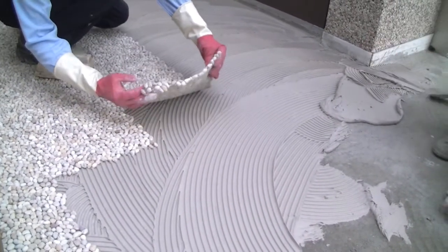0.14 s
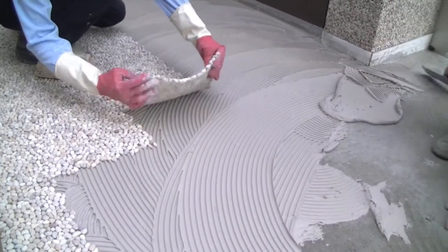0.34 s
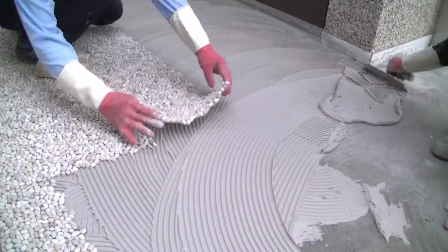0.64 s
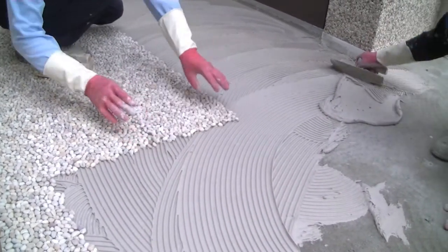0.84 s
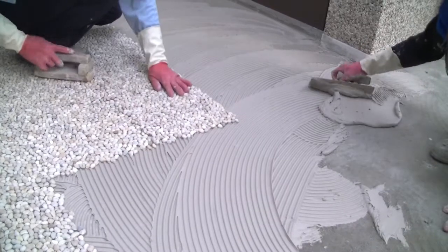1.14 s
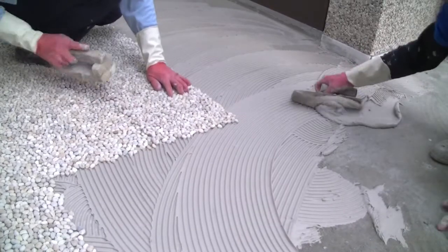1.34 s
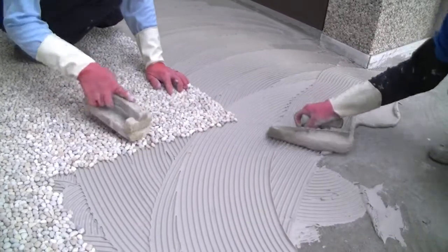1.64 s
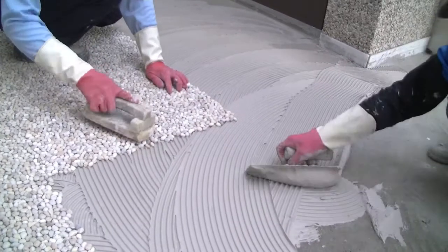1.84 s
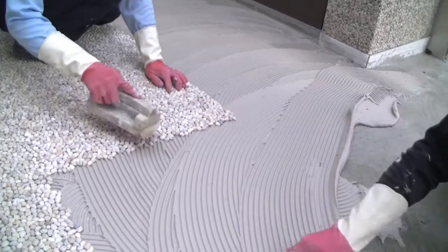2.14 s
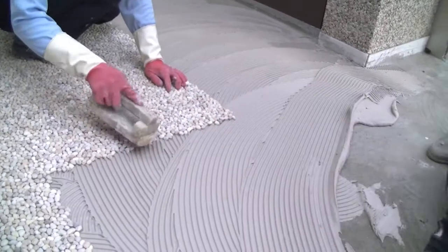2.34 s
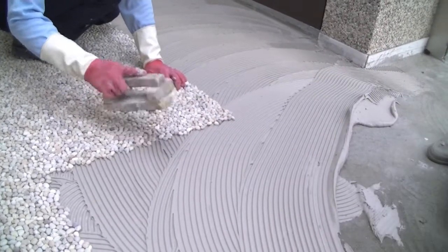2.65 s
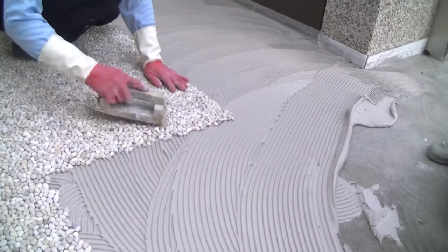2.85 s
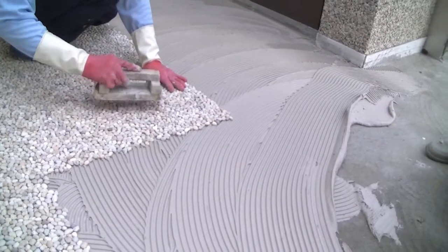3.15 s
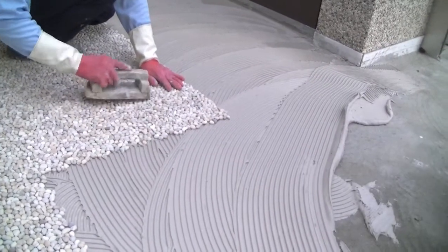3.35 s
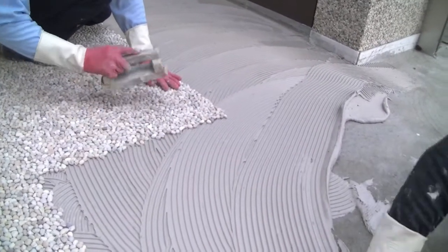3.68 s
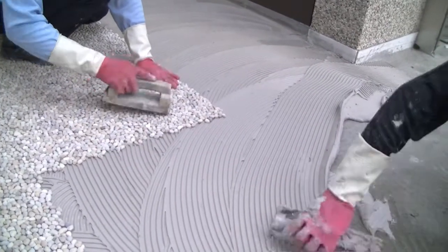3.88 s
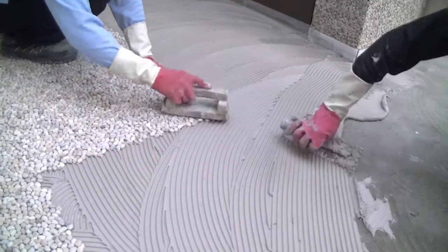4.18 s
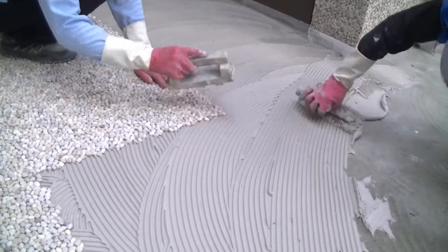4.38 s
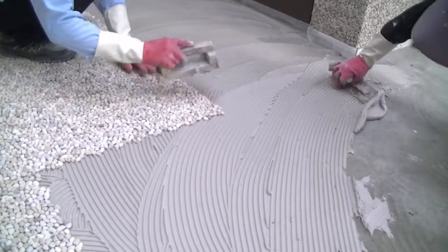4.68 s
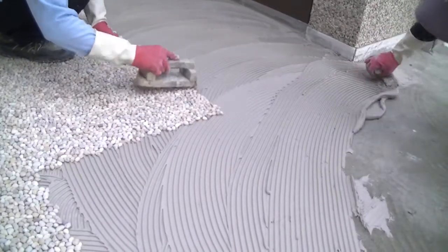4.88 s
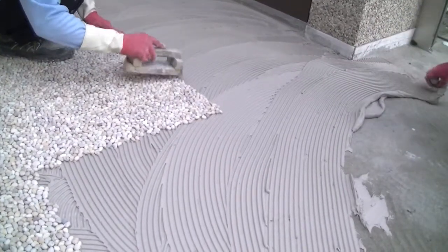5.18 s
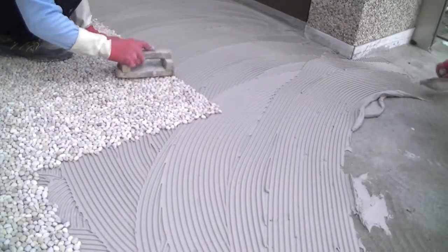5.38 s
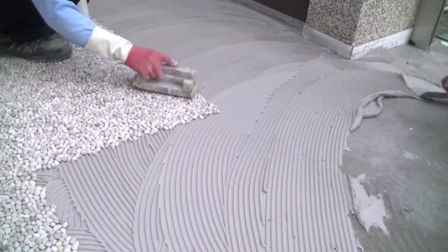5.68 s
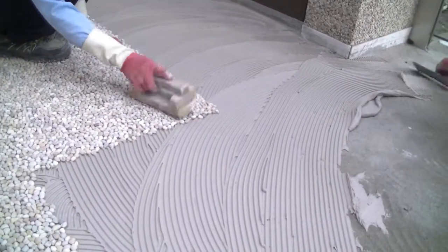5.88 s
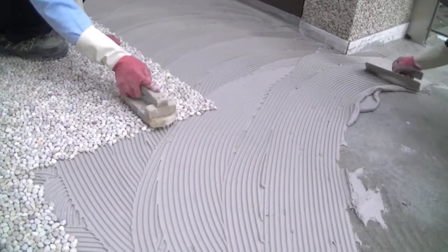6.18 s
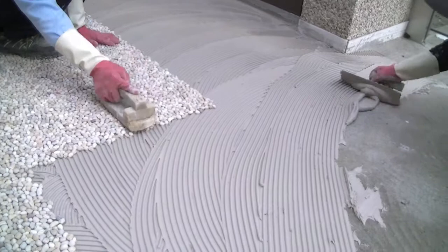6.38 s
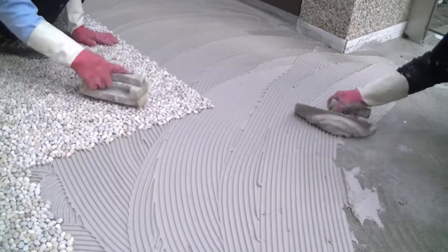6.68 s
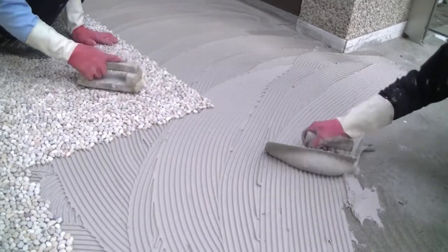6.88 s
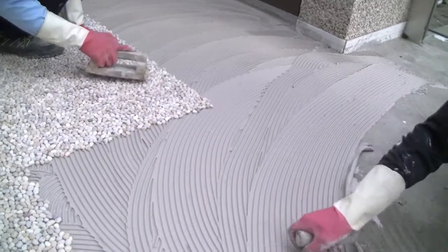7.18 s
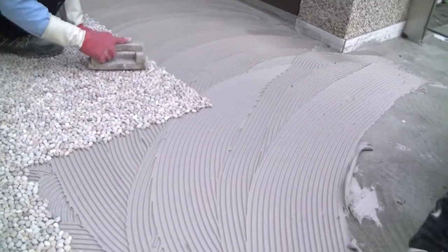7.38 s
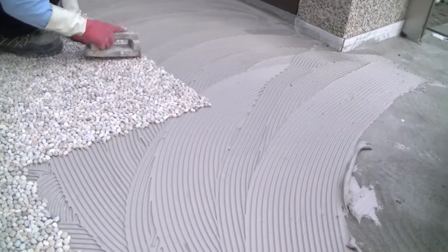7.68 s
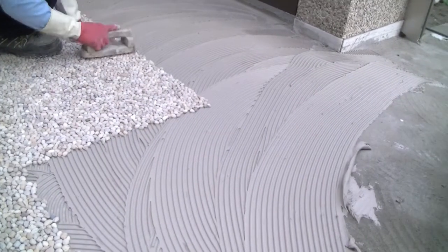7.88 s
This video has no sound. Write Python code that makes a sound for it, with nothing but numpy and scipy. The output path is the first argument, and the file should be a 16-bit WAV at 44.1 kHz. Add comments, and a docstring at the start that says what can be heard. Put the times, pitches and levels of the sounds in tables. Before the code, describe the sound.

Close beside a bare-walled floor, a steel trowel gives a short scuff and a few pebble ticks, then a long gritty scrape that swells. Midway through, a wooden float begins knocking pebbles with sharp stony clacks, about four a second, and continues to the end while two more long scrapes pass. Short hard reflections follow each sound; a faint site wash lies beneath. Thin, bright, nearly mono pickup with little bass.

```python
"""Trowel and float on tile adhesive

A notched steel trowel combs gritty adhesive over concrete in long strokes: dense random grain snaps
excite resonances of plate, blade, teeth and grit. A wooden float taps a pebble mat into the bed about
four times a second: clusters of contacts ring wood and stone. Loose pebbles and the blade edge tick.
Bare walls close by answer with a short tail of random-phase noise; a distant site washes underneath."""
import sys
import numpy as np
from scipy import signal
from scipy.fft import rfft, irfft, next_fast_len
from scipy.io import wavfile
from scipy.ndimage import uniform_filter1d, map_coordinates

SR = 44100
rng = np.random.default_rng(int(sys.argv[2]) if len(sys.argv) > 2 else 0)


def bounce(signal):
    """Save signal as a 16-bit WAV file at the path given by the first command-line argument."""
    frames = np.transpose(np.atleast_2d(signal))
    limited = np.clip(frames, -1, 1)
    pcm = np.round(limited * 32767).astype(np.int16)
    wavfile.write(sys.argv[1], SR, pcm)


N = 354123


def gain_of(db):
    """Decibels to an amplitude factor."""
    return 10 ** (np.asarray(db) / 20)


def evened(x):
    """Scaled to an rms of one."""
    return x / np.sqrt(np.mean(x ** 2) + 1e-20)


def read(points, hz):
    """A table interpolated over log frequency."""
    f, value = np.transpose(points)
    return np.interp(np.log(hz + 1), np.log(f + 1), value)


def add(mix, s, sound):
    """Mixes a sound in at time s."""
    part = mix[round(s * SR):][:len(sound)]
    part += sound[:len(part)]


def smooth_noise(shape, size):
    """Slow random wander: noise averaged twice over size samples."""
    return uniform_filter1d(uniform_filter1d(rng.standard_normal(shape), size=size), size=size)


def ring(hz, db, t60, size=2048):
    """A struck mode: a sine dying 60 dB in t60 seconds."""
    t = np.arange(size) / SR
    return gain_of(db - 60 * t / t60) * np.sin(2 * np.pi * hz * t)


def later(x, ms):
    """A copy that arrives a fixed or changing time later."""
    return map_coordinates(x, [np.arange(N) - ms * SR / 1000], order=3)


def resonate(x, hz, width_hz):
    """A moving resonance: shifts the curve hz down to zero, smooths, and shifts back."""
    turn = np.exp(2j * np.pi * np.cumsum(hz) / SR)
    r = np.exp(-np.pi * width_hz / SR)
    return (turn * signal.lfilter([1 - r], [1, -r], x / turn)).real


def resonate_twice(x, hz, width_hz, second_width_hz):
    """Two moving resonances in series for steeper skirts, at an rms of one."""
    return evened(resonate(resonate(x, hz, width_hz), hz, second_width_hz))


def site():
    """Steady distant wash of the site and the microphone's hiss: noise shaped in frequency."""
    # relative spectrum: (frequency [Hz], level per Hz [dB])
    wash_spectrum = [(18, -51), (30, 0), (540, -4), (2170, -5.5), (2750, -6.5), (2980, -7), (4530, -11.5),
                     (8740, -16), (14000, -44), (16000, -48)]
    hz = np.fft.rfftfreq(N, 1 / SR)
    a, b = irfft(rfft(rng.standard_normal((2, N))) * gain_of(read(wash_spectrum, hz)), N)
    return gain_of(-54) * evened(np.array([a + 0.21 * b, a - 0.25 * b]))


def walls(x):
    """Diffuse tail: power in each band lingers and dies at its own speed, with random phase."""
    # (frequency [Hz], t60 [s])
    wall_t60 = [(300, 0.5), (800, 0.27), (2100, 0.24), (5500, 0.31), (12000, 0.16)]
    # colour of the tail: (frequency [Hz], gain [dB])
    wall_colour = [(300, -1), (1500, -1.5), (4000, -1.5), (10000, 4), (13000, 1), (14500, -6), (16000, -30)]
    hop = 64
    frames = dict(fs=SR, nperseg=256, noverlap=256 - hop)
    hz, _, z = signal.stft(np.roll(x, 560), **frames)
    keep = gain_of(-120 * hop / SR / read(wall_t60, hz))  # a power factor, hence 120
    narrow, wide = (uniform_filter1d(abs(z) ** 2, size=n, axis=0) for n in (3, 15))
    # many scattered paths even out the colour, most in the treble
    blend = np.clip(hz / 5000, 0, 1)[:, None]
    fed = narrow + blend * (wide - narrow)
    power = np.array([signal.lfilter([1 - k], [1, -k], p) for k, p in zip(keep, fed)])
    a, b = rng.standard_normal((2, 2) + z.shape)
    field = (a + 1j * b) * np.sqrt(2 * abs(power)) * gain_of(read(wall_colour, hz))[:, None]
    mid, side = signal.istft(field, **frames)[1][:, :N]
    side = signal.sosfilt(signal.butter(2, 11500, fs=SR, output="sos"), side)
    return np.array([mid + 0.1 * side, mid - 0.18 * side])  # the ports hear nearly the same


def ports(x, lead):
    """Two close microphone ports: a small scattered difference that depends on frequency."""
    # difference between the ports, before the lead factor: (frequency [Hz], level [dB])
    port_difference = [(60, -21), (290, -47), (640, -25.5), (1410, -26.5), (2800, -17.5), (4300, -8.5),
                       (6500, -19), (9500, -14.5), (12500, -35), (15000, -48)]
    size = next_fast_len(N)
    hz = np.fft.rfftfreq(size, 1 / SR)
    scatter_s = 0.0005  # decay constant of the scatter around the housing
    paths = rng.standard_normal(1024) * np.exp(-np.arange(1024) / SR / scatter_s)
    scatter = 1j * abs(rfft(paths / np.linalg.norm(paths), size))
    scatter *= lead * gain_of(read(port_difference, hz))
    side = irfft(rfft(x, size) * scatter, size)[:N]
    return np.array([x + side, x - side])


def ticks():
    """Loose pebbles and the blade edge: short decaying noise rattles a bright mode."""
    # (time [s], peak level [dB], pitch [Hz], decay constant, at least 0.0005 [s], t60 of the ring [s])
    rattles = [(0.016, -40, 2760, 0.0044, 0.00062), (0.043, -34.5, 3630, 0.014, 0.00071),
               (0.141, -27, 7300, .0035, 0.0009), (0.184, -50, 7140, .002, .001),
               (0.24, -35, 10200, .001, 0.00065), (0.3022, -41, 9290, .0027, .001),
               (0.626, -27, 4400, 0.0023, .003), (0.667, -18.5, 6840, 0.0029, 0.0051),
               (0.668, -27, 3670, 0.0045, 0.0092), (0.765, -23.5, 8400, 0.0036, 0.00092),
               (3.675, -17, 10000, 0.0018, .001), (5.382, -29, 5100, .002, .003),
               (5.424, -39, 9500, .004, .001), (5.459, -40, 6500, .002, .001),
               (5.853, -57, 9000, .003, .001)]
    out = np.zeros(N)
    for (s, db, hz, decay_s, t60), chance in zip(rattles, rng.standard_normal((len(rattles), 800))):
        burst = chance * np.exp(-np.arange(len(chance)) / SR / max(decay_s, .0005))
        rattle = np.convolve(burst, ring(hz, 0, t60, size=400))
        add(out, s, gain_of(db) * rattle / abs(rattle).max())
    return out


def impact_parts(contacts):
    """Contacts ring the wooden float, click the stones and thud; each part at a peak of one."""
    # modes of the float: (pitch [Hz], level [dB], t60 [s])
    float_modes = [(1525, 7, 0.0036), (2280, 2, 0.011), (2870, -3, 0.0057), (3820, 4.5, 0.0034),
                   (4390, -3.5, 0.006)]
    wood = sum((-1) ** k * ring(*mode) for k, mode in enumerate(float_modes))
    wood = np.convolve(wood, [1, -1])  # a small body sends out little bass
    stone = ring(9600, 0, .0015) + ring(7000, -2, .0015) + ring(12000, -14, .001)
    stone = np.convolve(stone, ring(9000, 0, .0004, size=64))
    thud = np.convolve(ring(724, 0, 0.011), ring(800, 0, 0.004, size=64))
    parts = [np.convolve(contacts, body[:2048]) for body in (wood, stone, thud)]
    return [part / abs(part).max() for part in parts]


def tap(row, chance):
    """The float lands on many pebbles within milliseconds; each contact clicks and rings the wood."""
    s, db, *clack, linger_hz, tick_db, thud_db, linger_db = row
    t = np.arange(len(chance)) / SR
    spread_s = .003
    onset = np.minimum(t / spread_s, 1)
    landing = np.minimum(t / 0.0003, 1) * np.exp(-(t / spread_s) ** 4 - t / spread_s / 2)
    # pebbles keep crackling as they settle into the bed
    settling = gain_of(-11 - 60 * t / 0.05) * onset
    contacts = (chance * (landing + settling) * (abs(chance) > .8))[:2048]
    # fuzzy rings linger at the pitches of float and thud: (pitch, gain in dB, width in Hz)
    lingering = ((linger_hz, 0, 55), (clack[1], -7, 250), (650, -6, 150))
    sound = sum(gain_of(g) * evened(resonate(chance, np.full(len(t), f), width))
                for f, g, width in lingering)
    sound *= gain_of(linger_db - 60 * t / .5) * np.minimum(t / 0.0035, 1)
    # the clack is driven while the float lands, then damped
    knock = sum(gain_of(g) * np.sin(2 * np.pi * f * t) for f, g in zip(clack[:3], clack[3:]))
    sound += knock * (landing + 0.12 * onset * gain_of(-60 * t / .025))
    wood, stone, thud = impact_parts(contacts)
    add(sound, 0, gain_of(-7) * wood + gain_of(tick_db) * stone + gain_of(thud_db) * thud)
    push_s = 0.0014  # the slab gives a low push
    push = gain_of(-24) * t / push_s * np.exp(1 - t / push_s)
    return s, gain_of(db) * (sound + push)


def float_taps():
    """Every blow, with its slap off the nearest wall: a delayed, roughened copy."""
    # (time [s], blow level [dB], three clack pitches [Hz], their three levels [dB],
    #  lingering pitch [Hz], stone tick level [dB], wooden thud level [dB], lingering level [dB]),
    # part levels relative to the blow
    blow_rows = [(1.5872, -11, 1360, 2330, 2810, -12, -3.5, -9, 1800, -0.5, -31, -40),
                 (1.8307, -6.5, 1380, 2200, 3060, -6.5, -5, -7, 1960, -8.5, -36, -29.5),
                 (2.0538, -10.5, 1310, 2175, 4800, -10, -5, -16, 1400, 1, -34, -28),
                 (2.2714, -8.5, 2120, 3050, 4240, -4, -6, -17, 1990, -9, -30, -32),
                 (2.4925, -7.5, 1300, 1980, 2740, -10, -9, -8.5, 1370, -6, -21, -26),
                 (2.758, -7, 2210, 2800, 3550, -8.5, -6.5, -23, 2140, -6.5, -17, -34),
                 (3.034, -8.5, 1580, 2390, 2910, -7.5, -10.5, -9, 2150, -5, -18, -33),
                 (3.2815, -10, 1570, 1780, 2290, -8, -5.5, -7, 1950, -4.5, -23, -31),
                 (3.5163, -11.5, 1990, 2260, 2750, -5.5, -6, -11, 2060, 0.5, -15, -35),
                 (3.806, -9, 1370, 2080, 2460, -4, -7, -7, 1680, -16, -38, -41),
                 (4.1678, -10.5, 1390, 2510, 3520, -10, -7, -9, 1310, -2, -24, -23),
                 (4.4975, -9, 1220, 1620, 2860, -10, -8, -8, 1350, -3.5, -13.5, -31),
                 (4.8043, -10.5, 1250, 1990, 3150, -9, -6, -7, 2030, -3, -14, -25.5),
                 (5.092, -9, 1900, 2290, 2800, -2, -11, -14, 1990, -5, -12, -25.5),
                 (5.3642, -11.5, 1330, 2610, 3000, -10.5, -7.5, -8.5, 1400, 0, -21, -40),
                 (5.6474, -6.5, 1220, 1450, 2210, -11, -4.5, -12, 1600, -9, -14, -28.5),
                 (5.911, -12, 1310, 2530, 3560, -9.5, -5.5, -11, 2100, 0, -19, -24.5),
                 (6.153, -12, 2310, 2800, 3170, -4, -5, -16, 1960, 1, -30, -29),
                 (6.392, -9.5, 1170, 2080, 2580, -8, -9, -2, 1960, -1, -10, -29),
                 (6.6402, -10, 1290, 2100, 2890, -6.5, -5, -7, 2200, -4, -31, -45),
                 (6.8897, -9, 1530, 1860, 4240, -5, -8, -13, 1590, -1, -16, -23.5),
                 (7.1381, -11.5, 1040, 1650, 2885, -17, -3.5, -11, 1270, -6, -10, -26.5),
                 (7.386, -11, 1220, 1640, 2050, -15, -7, -8, 2110, -11, -18, -25),
                 (7.634, -13, 2210, 2410, 3470, -3, -14, -13, 1310, -10, -10, -25),
                 (7.8753, -7.5, 1300, 2210, 3130, -7.5, -7, -7, 1140, -14, -15, -32)]
    out = np.zeros(N)
    for row, chance in zip(blow_rows, rng.standard_normal((len(blow_rows), 14000))):
        add(out, *tap(row, chance))
    rough_wall = rng.standard_normal(220) * np.exp(-np.arange(220) / SR / .0015)
    rough_wall = np.convolve(rough_wall / np.linalg.norm(rough_wall), [.25, .5, .25])
    slap = signal.oaconvolve(later(out, 8.4), rough_wall)[:N]
    return out + 0.28 * slap


def hand():
    """Hand on blade: levels of plate, flex, teeth, grit and rasp; pitches of rasp and drone, over time."""
    # one table a stroke: (time [s], blade flex level [dB], teeth level [dB], grit fizz level [dB],
    #  plate drone level [dB], drone pitch [Hz])
    stroke_tables = [
        [(0.66, -41, -43.5, -45.5, -45, 650), (0.94, -39, -40.5, -42.5, -40, 640),
         (1.1, -33.5, -32, -38.5, -37, 674), (1.24, -38, -37, -40.5, -39, 585),
         (1.33, -34.5, -37, -39.5, -38.5, 745), (1.55, -35, -36.5, -38, -37.5, 676),
         (1.72, -33, -32, -34, -35.5, 710), (1.85, -34, -32.5, -36.5, -38, 755),
         (2.12, -31.5, -29.5, -29.5, -33.5, 756), (2.3, -32, -30, -29.5, -33, 800),
         (2.42, -32.5, -32, -29, -36, 744), (2.66, -37.5, -33.5, -36, -42, 815),
         (2.81, -47, -53, -54, -52, 730)],
        [(3.62, -42, -44, -32, -50, 832), (3.692, -32, -24.5, -30, -32, 900),
         (3.822, -27.5, -28.5, -27, -30, 833), (3.908, -28.5, -25.5, -28.5, -29.5, 870),
         (4.046, -25.5, -26, -28.5, -32, 784), (4.2, -28.5, -29, -30, -38, 675),
         (4.36, -31, -35, -30.5, -37, 617), (4.46, -32, -37.5, -34, -41.5, 710),
         (4.722, -32.5, -34, -31, -39, 690), (5.058, -37.5, -38, -38, -42, 590),
         (5.186, -38, -41, -39, -47, 660), (5.27, -39, -36, -54, -34, 754)],
        [(5.96, -69, -63, -60, -56, 690), (6.014, -36, -34, -40.5, -70, 650), (6.08, -35, -37, -41, -58, 875),
         (6.14, -36, -32.5, -39, -39.5, 745), (6.45, -32, -32, -34, -36.5, 674),
         (7.032, -36.5, -37.5, -33, -39, 692), (7.052, -32.5, -34, -32.5, -35.5, 650),
         (7.242, -34, -36, -35.5, -35, 655), (7.504, -35, -36.5, -34.5, -41.5, 797),
         (7.624, -34, -37.5, -33.5, -39.5, 650), (7.76, -33, -27, -34.5, -37, 910)],
    ]
    # the blade lands, bites or lifts: (start [s], rise [s], hold [s], fall [s], level [dB],
    #  teeth [dB], fizz [dB], drone [dB], rasp [dB] against that level, rasp pitch [Hz], drone pitch [Hz])
    scuff_rows = [(0.039, 0.1, 0.053, 0.089, -36.5, -1.5, -3.5, -10.5, -28, 2300, 696),
                  (0.371, 0.0044, 0.05, 0.017, -39, -1, -4, -7, -26, 2000, 684),
                  (0.403, 0.025, 0.19, 0.15, -23.5, -4.5, -6.5, -14, -4, 2960, 650),
                  (2.672, .006, 0.0049, 0.02, -45, -1.5, -11, -10, 2, 1200, 810),
                  (2.715, 0.015, 0.078, .03, -37, -3, -1.5, -8, 0, 1170, 745),
                  (3.182, 0.0051, 0.023, 0.098, -25.5, -0.5, -6.5, -8.5, -19, 2460, 766),
                  (3.525, 0.015, .01, 0.16, -32.5, -1.5, -2, -9.5, -16, 2040, 705),
                  (3.577, 0.013, 0.0068, 0.37, -32.5, -1.5, -1.5, -4.5, -1, 1360, 840),
                  (5.538, 0.0066, 0.005, 0.036, -48, -1.5, 0, -7, -6, 1700, 640),
                  (5.915, 0.044, 0.025, 0.093, -24.5, -2, -10.5, -7, -19, 2070, 1170),
                  (5.986, 0.014, 0.012, 0.034, -33, -5, -11, -17, 4, 2000, 650),
                  (7.711, 0.028, 0.094, 0.085, -28, -1, -4.5, -4.5, -14, 3430, 1220),
                  (7.831, 0.016, 0.032, 0.04, -27, -2, -6.5, -11, -15, 3060, 435),
                  (7.879, 0.0044, 0.026, .05, -34.5, -2, -10, 0.5, -1, 3150, 1130)]
    t, levels, pitches = np.arange(N) / SR, np.zeros((5, N)), np.full((2, N), 1000.)
    for rows in stroke_tables:
        s, *columns = np.transpose(rows)
        on = (t >= s[0]) & (t < s[-1])
        db, teeth_db, fizz_db, drone_db, hz = (np.interp(t[on], s, c) for c in columns)
        fade = np.clip(np.minimum((t[on] - s[0]) / 0.02, (s[-1] - t[on]) / 0.088), 0, 1)
        # the bent blade rasps more when pressed hard
        rasp_db = db - 8.5 + 0.71 * (db + 31.5)
        levels[:, on] += fade * gain_of([drone_db, db, teeth_db, fizz_db, rasp_db])
        pitches[:, on] = 1.998 * hz, hz
    for (start, rise, hold, fall, db, teeth_db, fizz_db, drone_db, rasp_db,
         rasp_hz, drone_hz) in scuff_rows:
        end = start + rise + hold + fall
        on = (t >= start) & (t < end)
        held = t[on] - start - rise
        # sags 11 dB/s from the end of the rise, and 39 dB more over the fall
        drop_db = 11 * np.maximum(held, 0) + 39 * np.maximum(held - hold, 0) / fall
        shape = np.minimum((t[on] - start) / rise, 1) ** 2 * gain_of(db - drop_db)
        levels[:, on] += shape * gain_of([[drone_db], [-5.5], [teeth_db], [fizz_db], [rasp_db]])
        # the fizz dies faster
        levels[3, on] -= shape * gain_of(fizz_db) * (1 - gain_of(-2.21 * drop_db))
        pitches[:, on & (t < end - fall / 2)] = [[rasp_hz], [drone_hz]]
    wander_db = 0.74 * evened(smooth_noise((5, N), 3000))
    return levels * gain_of(wander_db), pitches


def edge_judder():
    """The edge judders over the rough slab, so the snaps come in clumps: a random gain."""
    fast = evened(uniform_filter1d(rng.standard_normal(N), 250))
    slow = evened(uniform_filter1d(rng.standard_normal(N), 2000))
    return gain_of(0.33 * fast + 1.09 * slow)


def grains(judder):
    """A dense train of sand-grain snaps, a few of them large."""
    size_db = 2.3 * np.minimum(rng.exponential(1, N), 6)
    return evened(judder * rng.standard_normal(N) * gain_of(size_db) * (rng.random(N) < .4))


def rasp(hz, judder):
    """Bent blade rasping: snaps through a broad moving resonance with a narrow core."""
    broad = resonate_twice(grains(judder), hz, 780, 780)
    return broad + gain_of(-6) * resonate_twice(grains(judder), hz, 170, 170)


def drone(hz, judder):
    """Plate drone: its resonance wanders as the hand bends the blade and the adhesive load changes."""
    drift, swell = evened(smooth_noise((2, N), 4000))
    wandering_hz = hz + 59.5 * drift
    return gain_of(1 * swell) * resonate_twice(grains(judder), wandering_hz, 206, 210)


def flex(drone_hz, judder):
    """Flexing blade: four resonances slide in pitch along with the drone."""
    # blade resonances: (pitch, unbent [Hz], width of the first pass [Hz], level [dB])
    flex_modes = [(1030, 270, 2), (1330, 280, -1.5), (1595, 190, -2.5), (1870, 700, -1)]
    straight_hz = 723  # drone pitch of the unbent blade
    bend = np.clip(uniform_filter1d(drone_hz, size=3000) / straight_hz, .8, 1.2) ** 0.43
    snaps = grains(judder)
    return evened(sum((-1) ** k * gain_of(db) * resonate_twice(snaps, f * bend, width, 2 * width)
                      for k, (f, width, db) in enumerate(flex_modes)))


def body_rings(level, modes, judder):
    """Snaps scaled by a level curve ring a body of fixed modes."""
    body = sum((-1) ** k * width * ring(hz, db, 1.89 / width) for k, (hz, width, db) in enumerate(modes))
    # a short ring at the mean pitch leaves little outside the part's range
    mean_hz = np.mean(modes, 0)[0]
    body = np.convolve(body, ring(mean_hz, 0, 2.44 / mean_hz, size=256))
    return signal.oaconvolve(grains(judder) * level, body / np.linalg.norm(body))[:N]


def close_echoes(x):
    """Two close reflections colour the scrape as the trowel moves."""
    # (time [s], short lag [ms], its share [factor], long lag [ms], its share [factor])
    echo_path = [(0, .5, .16, 1.5, .1), (2.1, .45, .22, 1.3, 0), (2.8, .7, .2, 1.3, 0),
                 (3.65, .62, .14, .8, .15), (4, .6, .2, 1.1, .3), (4.3, .6, .24, 1.32, .4),
                 (4.65, .56, .28, 1.45, .45), (5.1, .55, .16, 1.58, .2), (5.3, .55, .14, 1.6, 0),
                 (6.5, .5, .12, 3.15, 0), (6.85, .47, .18, 3.02, .3), (7.15, .46, .22, 2.8, .25),
                 (7.4, .52, .22, 2.6, 0), (8, .72, .2, 2.6, 0)]
    s, *columns = np.transpose(echo_path)
    short_ms, short, long_ms, long = (np.interp(np.arange(N) / SR, s, c) for c in columns)
    # a small face throws back treble only
    treble_band = signal.butter(1, (4500, 10000), "band", fs=SR, output="sos")
    bright = signal.sosfiltfilt(treble_band, x)
    return x + short * later(x, short_ms) + long * later(bright, long_ms)


def trowel():
    """Sand grains snap past the edge by the thousand; the snaps ring plate, blade, teeth, grit and slab."""
    # modes of each part: (pitch [Hz], nominal width [Hz], level [dB])
    plate_modes, teeth_modes, grit_modes = [(593, 125, 2.5), (1000, 490, -0.5)], [(2230, 700, -1.5), (3320, 820, 3.5),
                                                           (3660, 564, 5), (4230, 430, -0.5)], [(5070, 770, -2),
                                                                          (7000, 940, -0.5),
                                                                          (8260, 2220, 0),
                                                                          (9550, 2130, -2.5)]
    slab_modes, dust_modes = [(175, 280, 0.5), (344, 63, 5.2)], [(10500, 2300, 3.5), (14000, 5200, -6.5)]
    # the edge tilts and the bed thins: (time [s], slab rumble against the drone [dB],
    #  finest hiss against the fizz [dB], pitch of the song of the teeth [Hz], its level [dB])
    tilt_path = [(0, -25, -6, 2650, -23), (.55, -27, -10.5, 3020, -18), (.75, -7.5, -4.5, 3700, -33),
                 (1.3, -7, -6, 3770, -10), (2.2, -5, -5, 4000, -11.5), (2.8, -5, -13, 3550, -14),
                 (3.5, -34, -14, 3100, -33), (3.9, -20, -7, 3920, -7.5), (4.4, -16, -4, 3900, -3.5),
                 (4.8, -4, -8, 3870, -6), (5.25, -4, -7, 3740, -23), (6, -13, -8.5, 4370, -18),
                 (6.6, -6, -5, 3900, -20), (7.25, -9.5, -5, 4070, -5.5), (7.6, -5.5, -12, 3930, -26),
                 (8.03, -24, -13, 2950, -12)]
    (plate, blade, teeth, grit, rasping), (rasp_hz, drone_hz) = hand()
    s, *columns = np.transpose(tilt_path)
    slab_db, dust_db, song_hz, song_db = (np.interp(np.arange(N) / SR, s, c) for c in columns)
    judder = edge_judder()
    out = rasping * rasp(rasp_hz, judder) + plate * drone(drone_hz, judder)
    # the teeth sing
    out += teeth * gain_of(song_db) * resonate_twice(grains(judder), song_hz, 850, 850)
    out += gain_of(-2.5) * blade * flex(drone_hz, judder)
    out += gain_of(-4) * body_rings(plate, plate_modes, judder)
    out += gain_of(-4) * body_rings(teeth, teeth_modes, judder)
    out += gain_of(-0.4) * body_rings(grit, grit_modes, judder)
    out += gain_of(-5.5) * body_rings(plate * gain_of(slab_db), slab_modes, judder)
    out += gain_of(-1.5) * body_rings(grit * gain_of(dust_db), dust_modes, judder)
    return close_echoes(out)


def scene():
    """Both tools near the microphone, the walls behind them."""
    scrape, blows = trowel() + ticks(), float_taps()
    near = ports(scrape, 0.75) + ports(blows, 1.07)
    # the stone tick is shaded by the float and hardly reaches the walls
    dulled = signal.sosfilt(signal.butter(1, 2000, fs=SR, output="sos"), blows)
    return near + walls(gain_of(-8.5) * scrape + gain_of(-3.5) * dulled) + site()


def record(dry):
    """A small microphone with its bass cut and a faint noise of its own, then the band limit."""
    rumble = rng.standard_normal(N) + .3 * rng.standard_normal((2, N))
    own = gain_of(-92) * evened(signal.lfilter([1], [1, -.98], rumble))
    hiss = gain_of(-68.5) * np.convolve(rng.standard_normal(N), [.45, 1, .45], "same")
    bass_cut = signal.butter(3, 330, "high", fs=SR, output="sos")
    thin = signal.sosfilt(bass_cut, dry + hiss) + own + gain_of(-45) * dry  # a little bass leaks past
    band_limit = signal.firwin(511, 15900, window=("kaiser", 9), fs=SR)
    return signal.oaconvolve(thin, band_limit[None], "same")


dry = scene()
out = record(dry)
bounce(out)
```